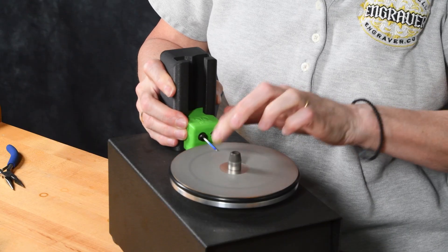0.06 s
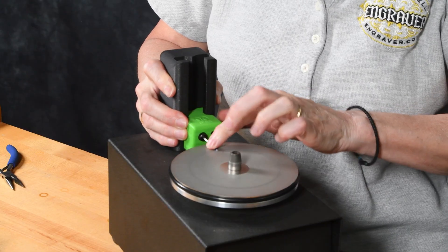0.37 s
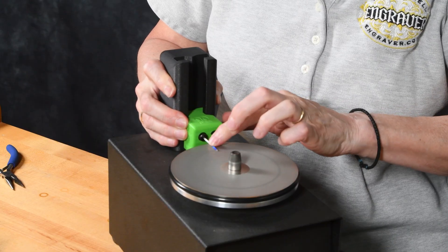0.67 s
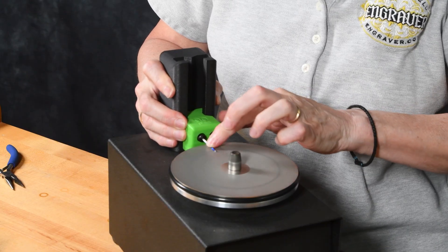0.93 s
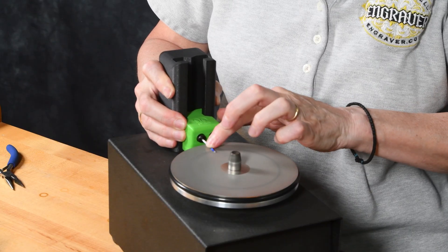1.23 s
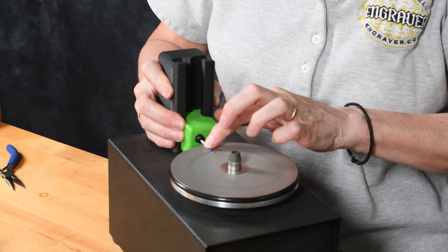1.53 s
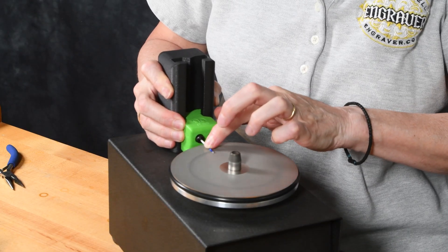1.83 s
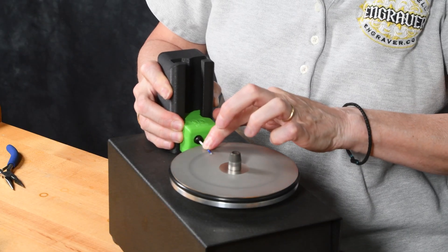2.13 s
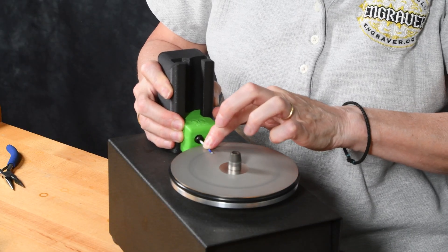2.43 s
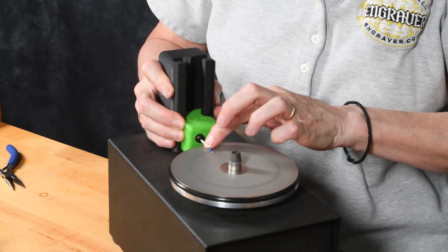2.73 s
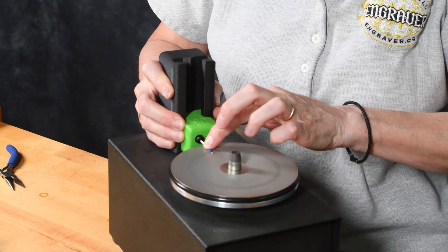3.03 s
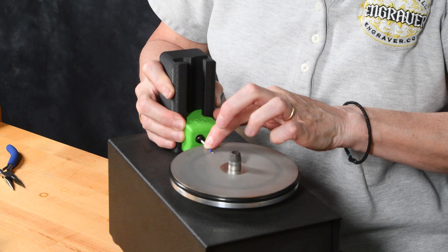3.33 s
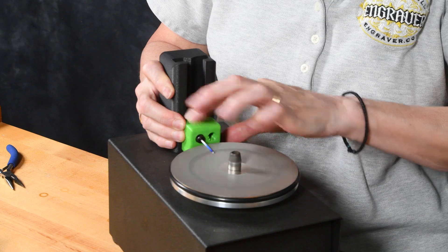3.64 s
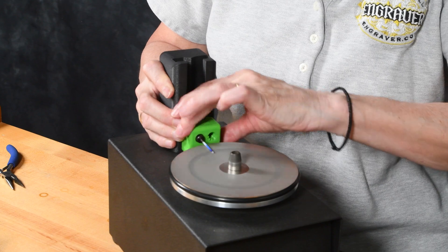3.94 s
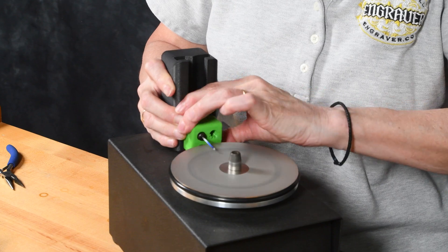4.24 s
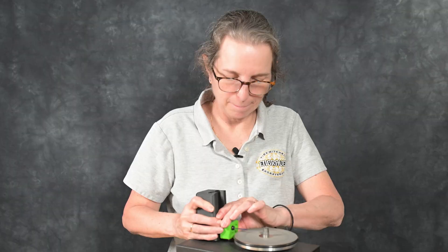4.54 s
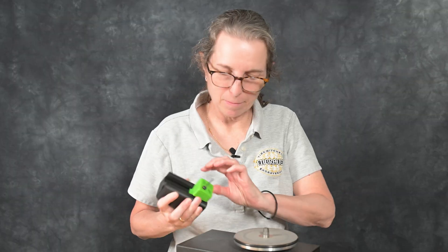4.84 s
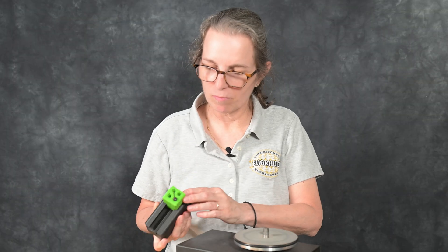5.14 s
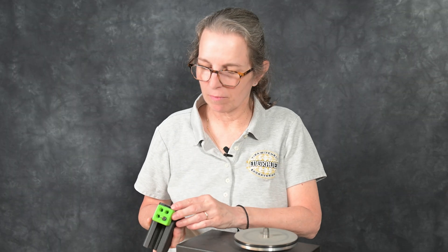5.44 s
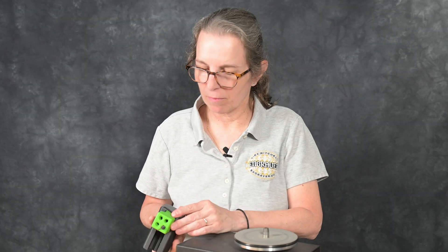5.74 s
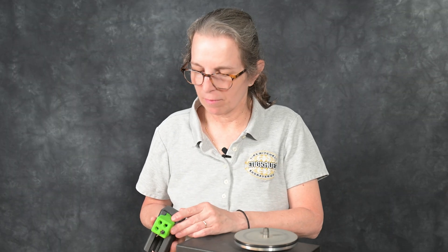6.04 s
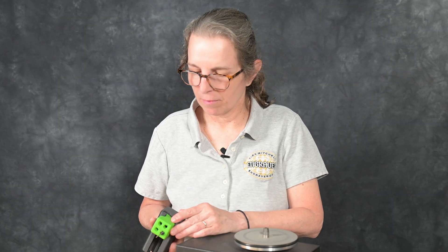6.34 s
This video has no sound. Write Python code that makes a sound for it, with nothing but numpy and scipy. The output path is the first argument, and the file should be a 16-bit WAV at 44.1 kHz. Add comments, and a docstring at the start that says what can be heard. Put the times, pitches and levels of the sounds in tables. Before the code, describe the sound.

Gritty, high-pitched scraping of metal on an abrasive wheel stops after about four seconds, while an electric motor keeps humming with light chatter.

```python
"""A steel graver in a plastic fixture, sharpened on a spinning diamond wheel, close to a mono lapel mic.
Grit rings the steel: resting free at first, damped and driven harder under a fingertip, then tipped up
and lifted off at about 4 s. Behind it the hone's mains motor hums and rumbles through its metal case,
and loose parts chatter in short fits. Fingers tick on the fixture. The place is a small, damped workshop."""
import sys
import numpy as np
from scipy import signal
from scipy.fft import rfft, irfft, next_fast_len
from scipy.io import wavfile
from scipy.ndimage import uniform_filter1d

SR = 44100
rng = np.random.default_rng(int(sys.argv[2]) if len(sys.argv) > 2 else 0)


def bounce(signal):
    """Save signal as a 16-bit WAV file at the path given by the first command-line argument."""
    frames = np.transpose(np.atleast_2d(signal))
    limited = np.clip(frames, -1, 1)
    pcm = np.round(limited * 32767).astype(np.int16)
    wavfile.write(sys.argv[1], SR, pcm)


N = 286297
T = np.arange(N) / SR

# Resonances of graver, fixture and wheel. Each row: frequency in Hz, width in Hz, then relative level
# in dB resting free, under the fingertip and tipped up.
GRAVER_MODES = [(396, 90, -15, -6, -28), (645, 100, 2, -26, -11), (639, 69, -19, 3.5, -4),
                (752, 127, -4.5, -2, -10), (900, 480, -13, -6.5, -18), (1232, 21, -3, 0.5, -1),
                (1296, 150, -1.5, -22, -11), (1426, 240, -6.5, -4, -12), (1647, 130, -20, -3.5, -33),
                (1766, 116, -7, -3, -16), (2084, 800, -11, -0.5, -10), (2420, 210, -29, -7.5, -9),
                (2780, 295, -11.5, -2.5, -17), (3083, 235, -4, -16.5, -8), (3730, 260, -1, -23.5, -26),
                (3920, 1150, -10, -3, -13), (4380, 240, -14, -3.5, 0.5), (4580, 300, -1, -4.5, -2.5),
                (5100, 164, 1, -14, -4), (5460, 480, -12, -6.5, -17), (5890, 700, -11.5, -13, -1.5),
                (6510, 270, -11.5, -12, -2.5), (7010, 900, -12, -17, -46), (8895, 980, -17, -7, -31),
                (9310, 1100, -9.5, -32, -11), (10041, 690, -20, -18, -43), (11350, 410, -31, -20.5, -24),
                (11800, 1360, -21, -33, -15), (13400, 2000, -31, -40, -25), (14400, 650, -17, -43, -23),
                (15500, 960, -19, -36, -21)]
# How the graver is held. Each row: time in seconds, share pressed, share tipped up; the rest is free.
GRIP_SHARES = [(0, 0.09, 0.24), (.88, 0, 0.1), (1.0, 0.5, 0), (1.09, 0.73, 0.01), (1.58, 0.85, 0),
               (1.75, 0.99, 0.03), (3.68, 0.89, 0.09), (3.79, 0.01, 0.37), (3.99, .01, .91),
               (4.04, 0.3, 0.45)]
# The tip catches on the grit. Each row: start and length in seconds, level in dB, pitch and width in Hz.
TIP_SNAGS = [(0, .055, -31, 6500, 700), (.13, .08, -36.5, 6200, 900), (.14, .05, -42, 14800, 1300),
             (.4, .05, -36, 4560, 280), (.4, .05, -39.5, 6600, 400), (.41, .05, -44, 14500, 1000),
             (.69, .014, -28.5, 4550, 250), (1.17, .05, -37, 8950, 800), (3.53, .06, -34.5, 8900, 700),
             (3.798, .016, -29, 4540, 350), (3.968, .045, -34, 6450, 480), (4.0, .02, -27, 4490, 300),
             (4.02, .016, -34, 9400, 1200), (4.052, .045, -39, 8800, 900)]
# Modes that friction keeps singing. Each row: start and length in seconds, first pitch, last pitch and
# width in Hz, level in dB, swing with the wheel's turn in dB, steadiness from 0 to 1.
SINGING_MODES = [(0, .53, 1277, 1272, 45, -38.5, 0, .7), (.55, .42, 1285, 1270, 55, -45, 0, .4),
                 (.14, .22, 4760, 5060, 260, -40, 0, .1), (.39, .57, 4570, 4500, 190, -36.5, 0, .1),
                 (0, .95, 14400, 14600, 700, -47, 0, 0), (1.0, 1.85, 4490, 4450, 180, -39, 0, .1),
                 (1.03, .23, 3770, 3790, 160, -32, 0, .2), (1.33, .21, 3790, 3780, 180, -34.5, 1, .1),
                 (1.62, 2.09, 3780, 3760, 200, -32.3, 2.3, .15), (1.05, 2.8, 654, 646, 60, -41, 1, 0),
                 (1.08, 2.62, 370, 365, 55, -42, 1, 0), (1.65, 1.85, 3060, 3060, 170, -42.5, -4, 0),
                 (3.76, .26, 4540, 4490, 190, -34.5, 0, .15), (3.72, .27, 15300, 14600, 1200, -47, 0, 0)]
# Coarse grains hitting the point. Each row: start in seconds, level in dB.
GRAIN_STRIKES = [(.69, -27), (.942, -28), (3.758, -24), (3.781, -26), (3.808, -21), (3.831, -27),
                 (3.932, -28), (3.97, -28), (4.009, -18.5), (4.092, -27.5)]
# Resonances of the motor case. Each row: frequency in Hz, width in Hz, relative level in dB.
CASE_MODES = [(165.5, 31, -4), (252.4, 56, -5.5), (289.4, 8.7, -2), (374, 169, -4.5), (471.6, 30, -2.5),
              (647.5, 35, -4.5), (780, 250, -16), (880, 50, -10.5), (1245, 140, -29.5), (1468, 79, -11.5),
              (1784, 96, -18), (1940, 1200, -27), (2366, 102, -16.5), (2585, 91, -17), (2770, 70, -20.5),
              (3300, 660, -27.5), (3600, 22, -20), (4300, 270, -28.5), (4700, 380, -31.5),
              (5430, 126, -28.5), (5880, 300, -30.5), (6260, 3200, -40), (7940, 400, -41),
              (9230, 600, -39.5), (10100, 670, -39), (11200, 796, -46.5), (13834, 5549, -68)]
# Resonances of the fixture buzzing on the case. Each row: frequency and width in Hz, relative level in dB.
FIXTURE_MODES = [(651, 20, 7), (2530, 95, -22), (3380, 120, -18)]
# Fits of the idling drive. Each row: start and length in seconds, level in dB, rise in seconds.
CHATTER_FITS = [(4.147, 0.016, -48.5, 0.0024), (4.19, 0.0061, -46, 0.0018), (4.248, 0.033, -47.5, 0.0018),
                (4.328, 0.02, -48, .001), (4.366, 0.019, -50, .003), (4.424, 0.02, -44.5, 0.0018),
                (4.474, 0.022, -49, .004), (4.517, 0.038, -48.5, 0.0089), (4.587, 0.14, -45, 0.025),
                (4.825, 0.037, -50, 0.0036), (4.891, 0.059, -48, .003), (4.978, 0.061, -48, .003),
                (5.093, 0.055, -47.5, 0.026), (5.199, 0.029, -46, 0.0021), (5.275, 0.035, -48.5, .002),
                (5.341, 0.056, -49, .025), (5.447, 0.05, -44.5, 0.046), (5.57, 0.073, -46.5, .06),
                (5.715, 0.0089, -49.5, .006), (5.757, 0.034, -45.5, .003), (5.83, 0.029, -52, .006),
                (5.93, .01, -48, .003), (5.969, 0.07, -46, 0.044), (6.133, 0.037, -47.5, .002),
                (6.23, 0.013, -52.5, .003), (6.253, 0.075, -48, 0.03), (6.361, 0.012, -52.5, .004),
                (6.39, 0.0077, -50, .001), (6.462, 0.0088, -51, .002)]
# Lines of the mains hum. Each entry: frequency in Hz.
HUM_LINES_HZ = [120, 180, 240, 360, 600, 720]
# Strength of those lines, in the same order. Each row: level in dB idling, level in dB at full load.
HUM_LEVELS = [(-54, -54), (-52, -39.5), (-50, -56.5), (-42, -95), (-51.5, -55.5), (-54.5, -50)]
# Swells of the strongest hum line during the grinding. Each row: start and length in seconds.
DRONE_SWELLS = [(0.298, 0.059), (1.306, 0.39), (2.022, 0.046), (3.025, 0.14), (3.66, 0.028), (3.906, 0.076)]
# Fingers on the fixture. Each row: start and length in seconds, level in dB, centre and width in Hz.
FINGER_TOUCHES = [(4.747, 0.019, -48, 3600, 2200), (4.76, .12, -61, 7500, 5500),
                  (4.79, 0.019, -58, 13900, 2200), (4.957, 0.003, -46, 5000, 4500),
                  (5.076, 0.003, -40, 4800, 4200)]

GRIND_DB, PRESS_DB, TIP_DB = -29, 2.5, -5  # resting free; change from pressing; from tipping up
RELAX_S, RELAX_LENGTH_S, RELAX_DB = 3.52, .22, -4.5  # the finger eases off before tipping the graver
LIFT_S, LIFT_FALL_S, GRAZE_S = 4.02, 0.04, 4.07  # the graver leaves the wheel, then grazes it once
FIXTURE_OFF_S = 4.75  # the fixture stands on the case until then
WHEEL_TURNS_PER_S, HIGH_SPOT_S = 4.5, 2.245
MAINS_PULSE_HZ, DRONE_HZ = 120, 480


def grinding(pressed, tipped):
    """Close up, grit rings the graver; a fingertip damps its high modes; tipped up, the point judders."""
    skipping = grit(per_second=700, spread_db=-2, coarse_db=-2, clump_db=0.8)
    held = grit(per_second=1800, spread_db=-3.5, coarse_db=-11, clump_db=1)
    juddering = skipping * undb(1.6 * walk(170))
    shares = np.clip([1 - pressed - tipped, pressed, tipped], 0, 1)
    modes = np.array(GRAVER_MODES)
    steel = 0
    for grip, force in enumerate([skipping, held, juddering]):
        body = ring(force * rng.choice([-1, 1], N), modes[:, [0, 1, 2 + grip]], ripple_db=0.4)
        steel = steel + np.sqrt(shares[grip]) * treble_unit(body)
    steel = wandering_contact(steel, depth_db=1 + .7 * (1 - pressed), rate=17)
    return steel * grinding_strength(pressed, tipped) + snags(skipping)


def grit(per_second, spread_db, coarse_db, clump_db):
    """Force of a rough contact: countless fine grains in clumps, and single coarse ones."""
    fine = rng.standard_normal(N) * undb(clump_db * walk(420))
    sizes = undb(spread_db * np.minimum(rng.exponential(size=N), 2)) * rng.choice([-1, 1], N)
    coarse = (rng.random(N) < per_second / SR) * sizes
    return unit(fine + undb(coarse_db) * unit(coarse))


def wandering_contact(x, depth_db, rate):
    """The contact point wanders, so neighbouring groups of modes take turns in being loud."""
    centres = np.log([400, 700, 1300, 2200, 3000, 3800, 4600, 6500, 9000, 14000])
    size = next_fast_len(N)
    spectrum = rfft(x, size)
    log_hz = np.log(np.arange(size // 2 + 1) * SR / size + 1)
    bands = (irfft(spectrum * np.interp(log_hz, centres, row), size)[:N] for row in np.eye(len(centres)))
    return sum(band * undb(depth_db * walk(rate)) for band in bands)


def grinding_strength(pressed, tipped):
    """Pressure drives the grinding harder, each turn of the wheel sways it, and lifting off ends it."""
    relaxed = np.clip((T - RELAX_S) / RELAX_LENGTH_S, 0, 1)
    grip_db = GRIND_DB + pressed ** 2 * (PRESS_DB + RELAX_DB * relaxed) + tipped * TIP_DB
    sway_db = -(0.1 + 0.9 * pressed) * wheel_turn() + 0.54 * walk(29.92)
    graze = undb(-5) * burst(GRAZE_S, length=0.028, rise=0.0024, fall=.008)
    return undb(grip_db + sway_db) * (until(LIFT_S, LIFT_FALL_S) + graze)


def wheel_turn():
    """1 when the wheel's high spot is under the tip, -1 half a turn later."""
    return np.cos(2 * np.pi * WHEEL_TURNS_PER_S * (T - HIGH_SPOT_S))


def snags(force):
    """The tip catches on the grit and one resonance gives a short squeak."""
    out = 0
    for start, length, db, hz, width in TIP_SNAGS:
        squeak = unit(ring(force, [(hz, width, 0)]))
        out = out + undb(db) * burst(start, length, rise=length / 4, fall=0.0042) * squeak
    return out


def strikes():
    """A coarse grain hits the point: a broad crack and a brief ring of the undamped steel."""
    tipped_modes = np.array(GRAVER_MODES)[:, [0, 1, 4]]
    steel = unit(ring(rng.standard_normal(N), tipped_modes))
    crack = noise_band(hz=4000, width=5500)
    blows = sum(undb(db) * burst(start, length=.0012, rise=.0006, fall=.0022)
                for start, db in GRAIN_STRIKES)
    return blows * unit(steel + undb(-5) * crack)


def singing():
    """Friction keeps single modes ringing; they flutter and drift, and some swing with the wheel."""
    turn, out = wheel_turn(), 0
    for start, length, first_hz, last_hz, width, db, swing_db, steadiness in SINGING_MODES:
        hz = np.interp(T, [start, start + length], [first_hz, last_hz])
        narrow = signal.butter(2, width / 2, fs=SR, output="sos")
        flutter = signal.sosfilt(narrow, rng.standard_normal(N) + 1j * rng.standard_normal(N))
        # where friction limits the swing, the ring is steadier than noise
        flutter = flutter / (np.abs(flutter) + 1e-9) ** steadiness
        tone = unit(np.real(flutter * np.exp(2j * np.pi * np.cumsum(hz) / SR)))
        surge_db = swing_db * turn + 0.9 * (1 - steadiness) * walk(45)
        out = out + undb(db + surge_db) * burst(start, length, rise=0.01, fall=0.012) * tone
    return out


def hum(load, idle_fits):
    """The motor's magnetic hum, just behind the graver; load shifts the weight between its lines."""
    lines = [(hz, idle + load * (loaded - idle)) for hz, (idle, loaded) in zip(HUM_LINES_HZ, HUM_LEVELS)]
    lines.append((DRONE_HZ, drone_db(idle_fits)))
    out = 0
    for hz, db in lines:
        phase = 2 * np.pi * (hz * T + rng.random()) + 0.19 * walk(21)
        out = out + np.sqrt(2) * undb(db + 0.52 * walk(8.7)) * np.sin(phase)
    return out


def drone_db(idle_fits):
    """Level of the strongest hum line: it swells during the grinding and throbs with the idle chatter."""
    lag_s, full_fit_db = 0.017, -47
    pole = np.exp(-1 / (lag_s * SR))
    shaken = signal.lfilter([1 - pole], [1, -pole], idle_fits) / undb(full_fit_db)
    swell = sum(burst(start, length, rise=0.014, fall=0.021) for start, length in DRONE_SWELLS)
    waver = walk(15)
    idling_db = -41.5 + 0.5 * waver + 9.5 * np.minimum(shaken, 1)
    loaded_db = -43 + 8.5 * swell + 2 * waver * (1 - swell / 2)
    return idling_db + until(LIFT_S, LIFT_FALL_S) * (loaded_db - idling_db)


def rumble(load):
    """Rolling bearings drum the case steadily; the rotor's wandering tone sinks under load."""
    rolling = cut(rng.standard_normal(N), "low", hz=2000, order=2) + undb(-11) * rng.standard_normal(N)
    rotor_hz = 169 + 6 * walk(60)
    rotor = unit(np.sin(2 * np.pi * np.cumsum(rotor_hz) / SR))
    bearings = undb(-37 + 0.1 * walk(7.4)) * unit(ring(rolling, CASE_MODES, ripple_db=-1))
    return bearings + undb(-42 - 9 * load ** 3) * rotor


def chatter(idle_fits):
    """Loose drive parts buzz on the case in step with the mains; the fixture standing there joins in."""
    # while the graver is on the wheel the fits come at random; a light rub never stops
    random_fits = undb(-53.5) * np.clip(0.9 + walk(22.02), 0, 1.6) * until(GRAZE_S, LIFT_FALL_S)
    rub = undb(-67)
    fits = np.hypot(idle_fits + random_fits, rub)
    phase = 2 * np.pi * MAINS_PULSE_HZ * T
    shaking = undb(2 * (np.cos(2 * phase) + np.cos(3 * phase)))
    knocks = fits * shaking * grit(per_second=450, spread_db=-1.8, coarse_db=-4, clump_db=3)
    knocks = cut(knocks, "high", hz=650)  # short hard contacts carry little bass
    case = treble_unit(ring(knocks, CASE_MODES, ripple_db=3.5))
    fixture = undb(6.5) * unit(ring(knocks, FIXTURE_MODES)) * until(FIXTURE_OFF_S, fall=0.011)
    return np.sqrt(np.mean(fits ** 2)) * (case + fixture)


def handling():
    """Small plastic ticks and a brush of skin as the fixture is turned over."""
    return sum(undb(db) * burst(start, length, rise=length / 2, fall=length / 2) * noise_band(hz, width)
               for start, length, db, hz, width in FINGER_TOUCHES)


def whirr():
    """Far down in the background, a rough whistle in the drive swoops up and down."""
    swoops_per_s = 11.5
    hz = 1850 + 260 * np.sin(2 * np.pi * swoops_per_s * T + walk(8))
    roughness = 1 + walk(200) / 2
    return undb(-58) * unit(roughness * np.sin(2 * np.pi * np.cumsum(hz) / SR))


def workshop(x, t60_s, wet_db):
    """A small, well damped room: a short, dull tail that starts with the bench reflection at 3 ms."""
    t = T[:SR // 3]
    tail = rng.standard_normal(len(t)) * undb(-60 * t / t60_s) * (t > .003)
    tail = cut(tail, "low", hz=3500)
    return x + undb(wet_db) * signal.oaconvolve(x, tail / np.linalg.norm(tail))[:N]


def ring(x, modes, ripple_db=0, size=8192):
    """Pass x through (Hz, width Hz, dB) resonances; many weak modes between them ripple the response."""
    f = np.arange(size // 2 + 1) * SR / size + 1
    power = sum(undb(db) ** 2 / (1 + ((f * f - hz * hz) / (f * width)) ** 2) ** 2
                for hz, width, db in modes)
    ripple = unit(uniform_filter1d(rng.standard_normal(len(f)), size=9)) * f / (f + 1500)
    cepstrum = irfft(np.log(power + 1e-12) / 2 + np.log(undb(ripple_db * ripple)))
    # keeping only positive times makes the body ring after the blow
    cepstrum[1:size // 2] *= 2
    cepstrum[size // 2 + 1:] = 0
    response = irfft(np.exp(rfft(cepstrum)))
    return signal.oaconvolve(x, response)[:N]


def noise_band(hz, width):
    """Noise of rms 1 through one resonance."""
    return unit(ring(rng.standard_normal(N), [(hz, width, 0)]))


def cut(x, passes, hz, order=1):
    """A gentle filter that passes the "low" or the "high" side of hz."""
    return signal.sosfilt(signal.butter(order, hz, passes, fs=SR, output="sos"), x)


def burst(start, length, rise, fall):
    """An envelope that rises, holds and dies away; all times in seconds."""
    return np.clip((T - start) / rise + .5, 0, 1) * until(start + length, fall)


def until(end, fall):
    """An envelope that is 1 up to the given time and then dies away with time constant fall."""
    return np.exp(-np.clip((T - end) / fall, 0, 20))


def walk(rate):
    """A random curve of spread about 1 that moves rate times a second."""
    return 1.2 * np.interp(T * rate, np.arange(N // 8), rng.standard_normal(N // 8))


def undb(db):
    """Decibels to gain."""
    return np.exp(np.asarray(db) * np.log(10) / 20)


def unit(x):
    """Scale to rms 1."""
    return x / np.sqrt(np.mean(x ** 2))


def treble_unit(x):
    """Scale so that the band from 2.5 to 11 kHz has rms 1."""
    band = signal.butter(4, [2500, 11000], "band", fs=SR, output="sos")
    return x / np.std(signal.sosfilt(band, x))


def scene():
    """At the bench: graver, motor and hands reach one close microphone, which adds its own faint hiss."""
    grip_s, *shares = np.transpose(GRIP_SHARES)
    pressed, tipped = [np.interp(T, grip_s, share) for share in shares]
    load = until(FIXTURE_OFF_S, fall=0.051) * (0.5 + 0.54 * pressed)
    idle_fits = sum(undb(db) * burst(start, length, rise, fall=.0105)
                    for start, length, db, rise in CHATTER_FITS)
    graver = grinding(pressed, tipped) + strikes() + singing()
    contacts = workshop(graver + chatter(idle_fits) + whirr() + handling(), t60_s=.12, wet_db=-14)
    motor = rumble(load) + hum(load, idle_fits)
    hiss = undb(-77) * rng.standard_normal(N)
    mono = contacts + motor + hiss
    return np.array([mono, mono])


def record(dry):
    """The lapel microphone rolls off the deep bass; the recorder cuts the top at 15.9 kHz."""
    thin = cut(dry, "high", hz=45)
    return signal.sosfilt(signal.ellip(10, .2, 80, 15900, fs=SR, output="sos"), thin)


dry = scene()
out = record(dry)
bounce(out)
```